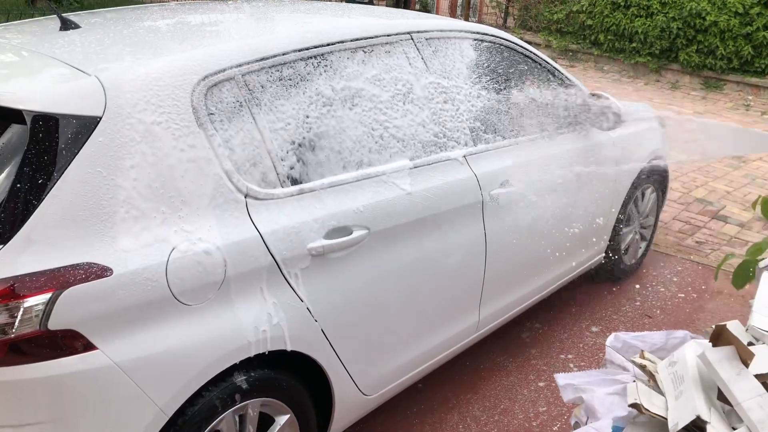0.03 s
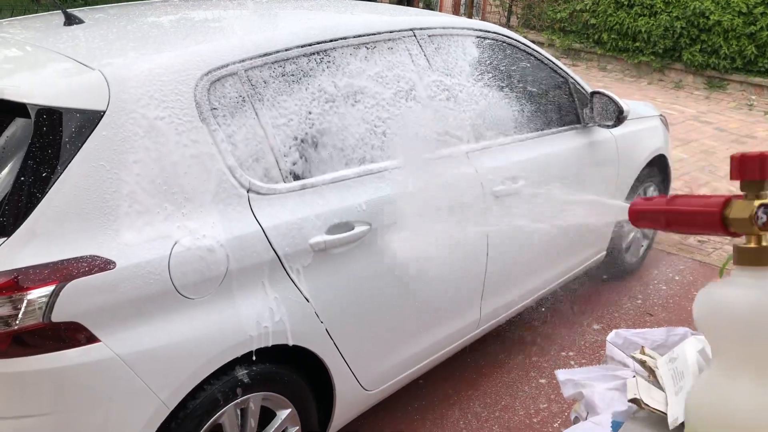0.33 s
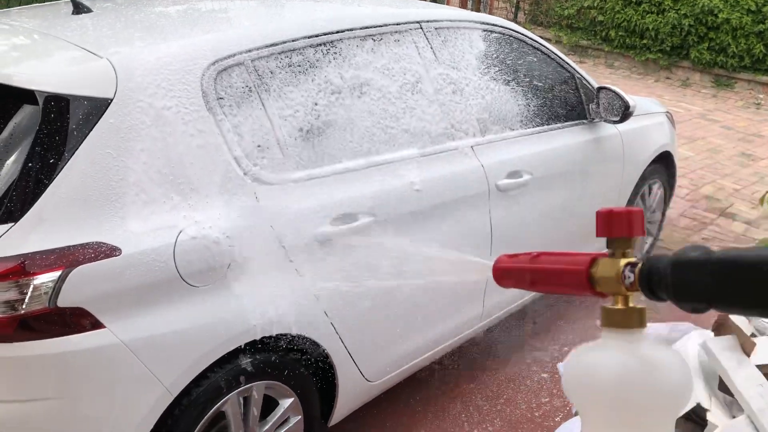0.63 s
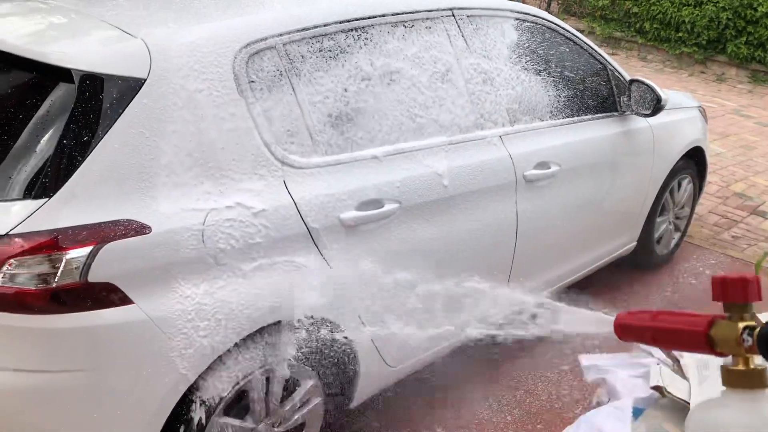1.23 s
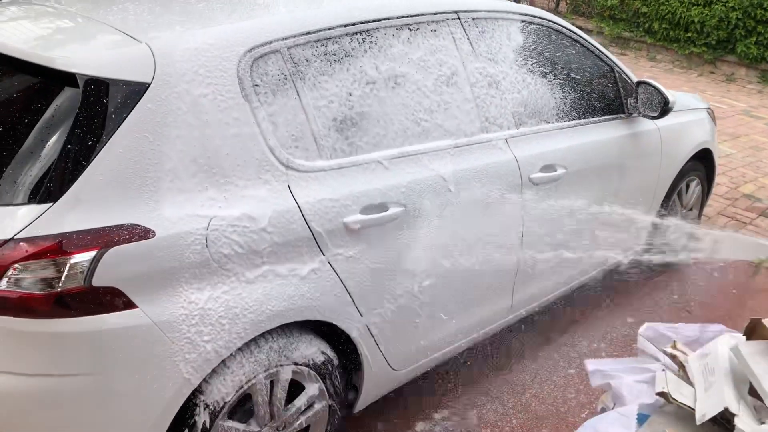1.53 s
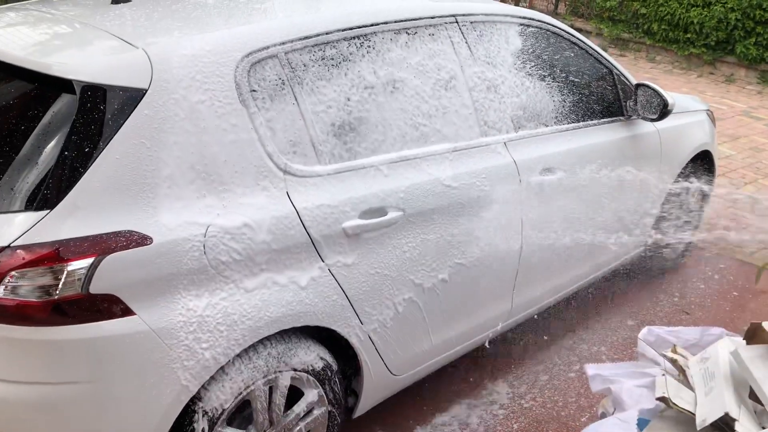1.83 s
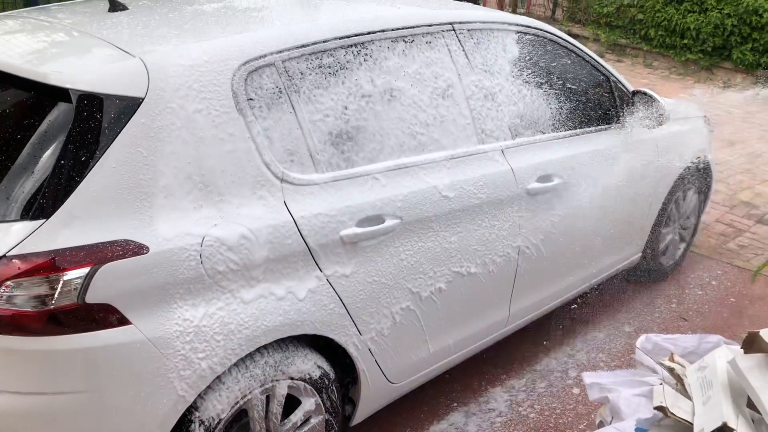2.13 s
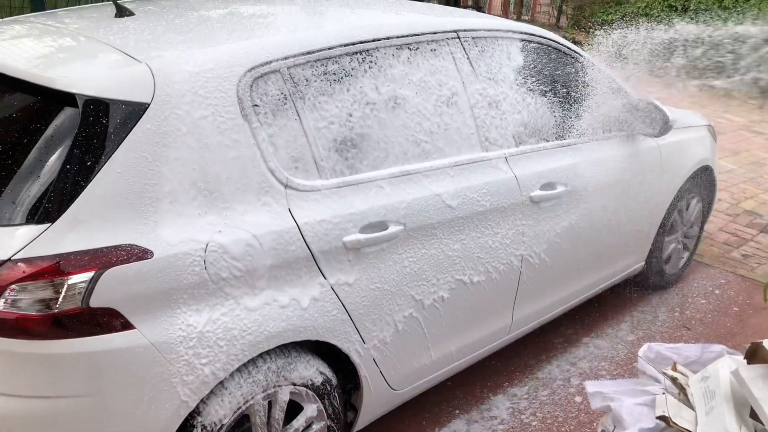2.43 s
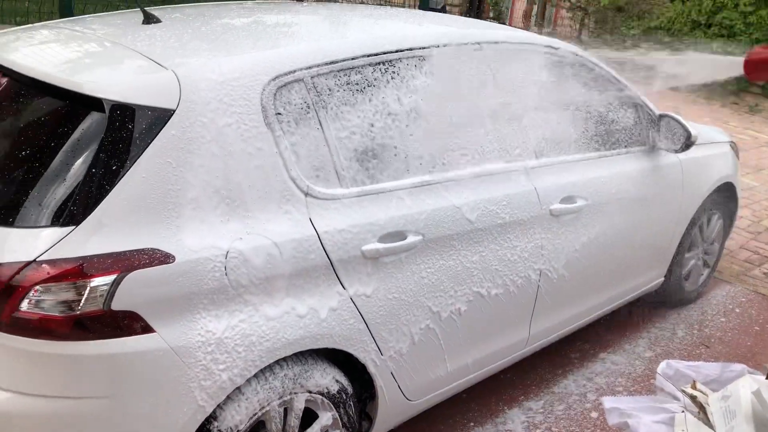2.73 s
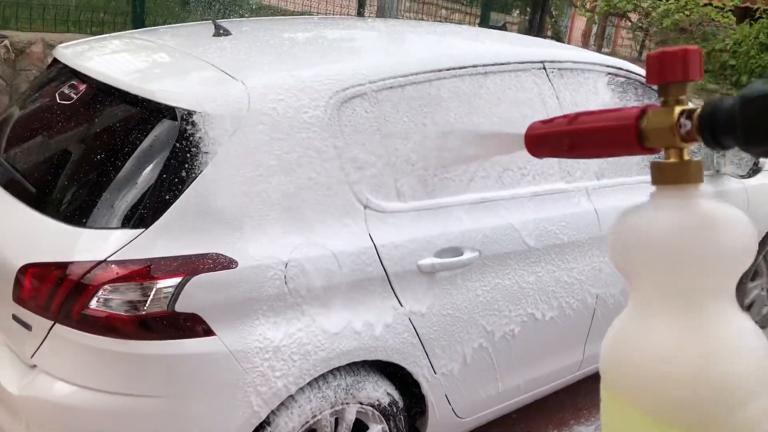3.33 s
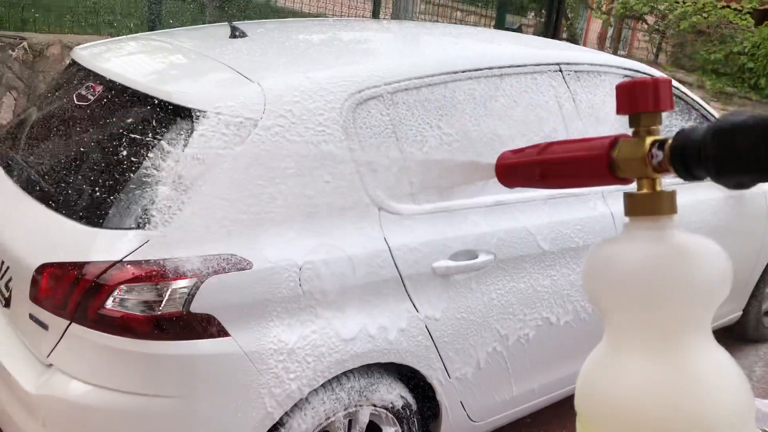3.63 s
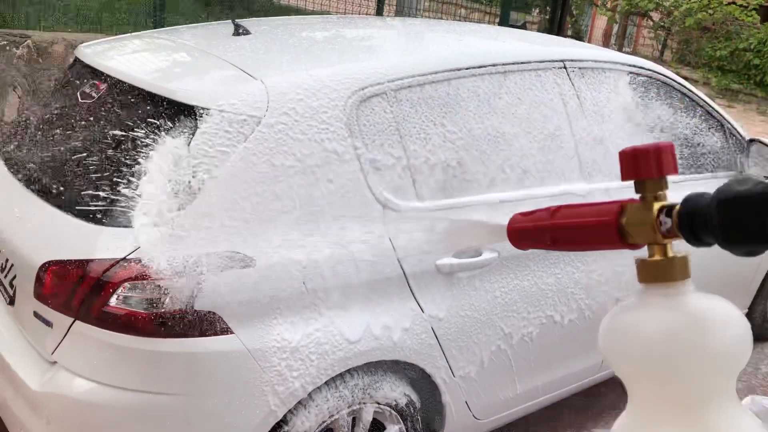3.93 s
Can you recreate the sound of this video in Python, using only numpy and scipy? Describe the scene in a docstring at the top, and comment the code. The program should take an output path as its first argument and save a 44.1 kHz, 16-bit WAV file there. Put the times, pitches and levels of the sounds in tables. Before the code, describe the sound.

A foam lance sprays a car with a loud, steady hiss and wet spatter, close to the microphone on a driveway. The panels drum dully and the jet swishes briefly, while a pressure washer hums faintly further off.

```python
"""Foam lance on a car

A foam lance sweeps along the side of a car on a driveway, heard close by and in mono. The nozzle
hisses, and the flow rings one hollow note in the lance. The fan of foam spatters on the panels, sets
them drumming and swishes where it crosses an edge. The pressure washer hums further off, and a few
puffs of air hit the microphone."""
import sys
import numpy as np
from scipy import signal
from scipy.fft import rfft, irfft
from scipy.io import wavfile
from scipy.ndimage import uniform_filter1d, map_coordinates

SR = 44100
rng = np.random.default_rng(int(sys.argv[2]) if len(sys.argv) > 2 else 0)


def inscribe(sig):
    """Save sig as 16-bit PCM at rate SR to the path in sys.argv[1].

    A 1-D sig is mono; a 2-D sig holds one channel per row.
    Samples are clipped to [-1, 1] before scaling.
    """
    pcm = np.round(np.clip(np.atleast_2d(sig).T, -1, 1) * 32767)
    wavfile.write(sys.argv[1], SR, pcm.astype(np.int16))


N = 176400

# Speed of the pump motor. Each row: time in seconds, shaft rate in Hz.
SHAFT_RATE = [(0, 46.5), (.6, 46.5), (1.5, 45.5), (2.3, 45.5), (3.2, 45.5), (4, 45.5)]
# Harmonics of the pump. Each row: multiple of the shaft rate, level in dB.
SHAFT_ORDERS = [(3, -52.5), (6, -37), (7, -49), (9, -45.5), (11, -44), (12, -46.5), (15, -48.5), (18, -49),
                (19, -44), (21, -49), (22, -49)]
# Puffs of air. Each row: centre in seconds, width in seconds, level in dB.
AIR_PUFFS = [(.07, .015, -50), (.205, .012, -51), (.725, 0.015, -37), (1.085, .015, -49), (1.18, .018, -45),
             (1.58, .014, -42), (1.9, .035, -48)]

# Envelopes along the sweep. Each row: time in seconds, relative level in dB.
PANEL_LEVEL = [(0.0, -35), (0.05, -32), (0.09, -33), (0.67, -31), (1.88, -34.5), (3.66, -29.5),
               (3.99, -32.5), (4.0, -28)]
FIZZ_LEVEL = [(0, -42), (.18, -31.5), (.26, -34), (.37, -29.5), (.7, -22.5), (.92, -20.5), (1.2, -21),
              (1.45, -24), (1.85, -28), (2.4, -28.5), (2.9, -26), (3.18, -24), (3.27, -21.5), (4, -20.5)]  # highest when the lance is near
NOTE_LEVEL = [(0, -40), (.08, -28), (.24, -32), (.32, -25), (.55, -24.5), (.72, -23.5), (1.3, -26.5),
              (2.08, -24.5), (2.35, -20), (2.65, -21.5), (3.08, -18.3), (3.35, -18.5), (3.65, -21.5),
              (3.8, -18.5), (4, -22)]
SPLASH_LEVEL = [(0, -31), (.16, -26), (.22, -26.5), (.31, -22), (.55, -19.5), (.75, -18.5), (1.25, -18),
                (1.5, -18), (1.85, -20.5), (2.1, -20), (2.4, -18.5), (2.65, -19), (3, -19), (3.35, -18.5),
                (3.7, -18.5), (4, -17.5)]
SLAP_LEVEL = [(0, -29.5), (.1, -25.5), (.23, -31), (.33, -24.5), (.55, -22.5), (.95, -22), (1.35, -23),
              (1.75, -23.5), (2.05, -27.5), (2.4, -28.5), (2.9, -26.5), (3.3, -28.5), (3.7, -29), (4, -27)]  # strongest on the door and wheel arch
# Spectra of the noises. Each row: frequency in Hz, relative spectral density in dB.
PANEL_SPECTRUM = [(20, -48), (55, -19.5), (100, -18), (160, -10.5), (235, 1), (345, -4), (470, 3.5),
                  (580, 1), (800, -3), (1100, -6), (1600, -0.5), (3000, -22), (16000, -60)]
FIZZ_SPECTRUM = [(1200, -32), (2200, -4), (5000, -38.5), (8500, -0.5), (10500, -1.5), (13000, -1),
                 (14500, 3), (15800, 3.5)]
SPLASH_SPECTRUM = [(700, -28), (1300, -20.5), (1750, -13), (2500, -3.5), (3100, -6), (4000, -4),
                   (4700, -4.5), (5400, 1), (6300, -2), (7300, -4), (8200, -9), (10500, -18.5),
                   (16000, -42)]
SLAP_SPECTRUM = [(600, -23), (1100, -12), (1500, -7.5), (1950, -1.5), (2450, 1), (2900, -1.5), (3500, -7.5),
                 (5000, -22), (16000, -62)]

# Hollow note of the lance. Each row: time in seconds, pitch in Hz.
LANCE_PITCH = [(0, 2080), (.7, 2054), (1.6, 2080), (2.4, 2150), (3.1, 2160), (3.5, 2115), (4, 2150)]
# The jet crosses an edge or hollow.
# Each row: start in seconds, length in seconds, first and last pitch in Hz, level in dB.
EDGE_CROSSINGS = [(0.287, 0.019, 2480, 2650, -18.5), (0.486, 0.031, 2730, 2580, -16),
                  (0.807, 0.16, 2300, 3500, -27), (1.242, .1, 4500, 2060, -19.5),
                  (1.782, 0.086, 3440, 2760, -22.5), (2.125, .06, 2800, 3400, -22)]
# Two broad resonances of the spray, shifting with the aim of the lance.
# Each row: time in seconds, centre in Hz, level in dB relative to SPLASH_LEVEL.
LOW_RESONANCE = [(0, 3930, -9), (.35, 3670, -8), (.7, 3730, -3), (1.2, 3800, -5.5), (1.55, 3950, -7),
                 (1.9, 3260, -6.5), (2.15, 3280, -2), (2.3, 4360, -24.5), (2.65, 4000, -6.5),
                 (3, 3760, -0.5), (3.3, 3560, -2), (3.65, 3540, -1), (4, 3930, -4.5)]
HIGH_RESONANCE = [(0, 5800, 4.5), (.6, 5460, -14), (1.2, 5640, -6.5), (1.4, 6100, -6), (1.6, 6140, -5.5),
                  (2, 6450, -1.5), (2.35, 6900, -1), (2.7, 6300, -8.5), (3.05, 6650, -1.5), (3.5, 5940, -8),
                  (4, 5700, -13)]
# Brief notches in the splash.
# Each row: time in seconds, width in seconds, centre in Hz, width in octaves, depth in dB.
SPLASH_NOTCHES = [(.01, 0.023, 3260, 0.3, 8), (.074, .013, 4540, 0.4, 10), (.2, .015, 5500, .6, 3.5),
                  (.25, 0.036, 2980, 0.13, 8), (.52, 0.041, 4930, 0.33, 5), (1.178, 0.0056, 4000, .8, 4),
                  (1.297, 0.012, 4230, .15, 10), (1.317, 0.011, 5700, 0.69, 6),
                  (2.165, .011, 5800, .4, 5.5), (3.3, 0.016, 5800, 0.36, 4.5)]

MAINS_HZ, MAINS_DB = 200, -50.5
HUM_START_DB, HUM_RISE_S, HUM_WAVER_DB = -6.5, .6, .57
PANEL_GAIN_DB, FIZZ_GAIN_DB, NOTE_GAIN_DB, HISS_GAIN_DB = .5, 5.5, -1, 1.5
DROPS_PER_S, DROP_SPREAD_DB, DROP_POWER_SHARE = 6000, 3.2, .33
NEAR_PATH_M, FAR_PATH_M, MAX_DRIFT_M_PER_S, SOUND_M_PER_S = .7, 7., .0699, 343


def amp(db):
    """Amplitude ratio of a level in decibels."""
    return 10 ** (np.asarray(db) / 20)


def unit(x):
    """Normalisation to rms 1."""
    return x / np.sqrt(np.mean(x ** 2) + 1e-20)


def curve(rows, column=1):
    """Linear interpolation of a time table at every sample."""
    rows = np.array(rows, float)
    return np.interp(np.arange(N) / SR, rows[:, 0], rows[:, column])


def colour(x, spectrum):
    """Spectral shaping, interpolated over log frequency, at rms 1."""
    hz, db = np.transpose(spectrum)
    gain_db = np.interp(np.log(np.fft.rfftfreq(N, 1 / SR) + 1), np.log(hz), db)
    return unit(irfft(rfft(x) * amp(gain_db), N))


def wander(rate_hz):
    """Random fluctuation: low-passed noise at rms 1."""
    hz = np.fft.rfftfreq(N, 1 / SR)
    return unit(irfft(rfft(rng.standard_normal(N)) * (hz > 1) / (1 + (hz / rate_hz) ** 2), N))


def resonate(x, hz, width_hz):
    """Forced resonance: x excites a band around a steady or moving centre, at rms 1."""
    carrier = np.exp(2j * np.pi * np.cumsum(hz * np.ones(len(x))) / SR)
    pole = np.exp(-np.pi * width_hz / SR)
    baseband = signal.lfilter([(1 - pole) ** 2], [1, -2 * pole, pole * pole], x / carrier)
    return unit((carrier * baseband).real)


def washer():
    """A rotating pump radiates harmonics of its shaft rate; these and a mains hum swell at the start."""
    t = np.arange(N) / SR
    turns = np.cumsum(curve(SHAFT_RATE) * (1 + .0016 * wander(rate_hz=2.3))) / SR
    partials = [(order * turns, db) for order, db in SHAFT_ORDERS] + [(MAINS_HZ * t, MAINS_DB)]
    hum = np.zeros(N)
    for cycles, db in partials:
        gain = amp(db + HUM_WAVER_DB * wander(rate_hz=3.5))
        hum += gain * np.sin(2 * np.pi * (cycles + rng.random()))
    return np.sqrt(2) * hum * amp(HUM_START_DB * np.maximum(1 - t / HUM_RISE_S, 0))


def puffs():
    """Pressure fluctuations of air striking the microphone make soft, low thumps."""
    t = np.arange(N) / SR
    swells = sum(amp(db) * np.exp(-.5 * ((t - centre) / width) ** 2) for centre, width, db in AIR_PUFFS)
    return resonate(rng.standard_normal(N), hz=66, width_hz=39) * swells


def panels():
    """Forced vibration: the bodywork drums dully under the spray."""
    return colour(rng.standard_normal(N), PANEL_SPECTRUM) * amp(curve(PANEL_LEVEL) + PANEL_GAIN_DB)


def reflect(x, count=12, echo_db=-8.5):
    """Interference with echoes off car, ground and walls forms a comb that drifts as the lance moves."""
    n, echoes = np.arange(N), np.zeros(N)
    paths = np.geomspace(NEAR_PATH_M, FAR_PATH_M, count)
    for path, (offset, drift, polarity) in zip(paths, rng.uniform(-.995, 1, (count, 3))):
        extra_m = path * (1 + .102 * offset) + MAX_DRIFT_M_PER_S * drift * n / SR
        delay = extra_m / SOUND_M_PER_S * SR
        echoes += np.sign(polarity) * map_coordinates(x, [n - delay], order=3, mode="mirror")
    return (x + amp(echo_db) * echoes / np.sqrt(count)) / np.sqrt(1 + amp(2 * echo_db))


def spray(patchy_db=1.15):
    """Shot noise of droplets plus rushing noise, modulated in brief patches of time and frequency."""
    impacts = (rng.random(N) < DROPS_PER_S / SR) * rng.choice([-1, 1], N)
    drops = unit(impacts * amp(DROP_SPREAD_DB * np.minimum(rng.exponential(1, N), 5)))
    noise = np.sqrt(1 - DROP_POWER_SHARE) * rng.standard_normal(N) + np.sqrt(DROP_POWER_SHARE) * drops
    spectra = signal.stft(noise, nperseg=512, noverlap=384)[2]
    patches = uniform_filter1d(rng.standard_normal(spectra.shape), size=11, axis=0)
    patches = unit(uniform_filter1d(patches, size=7, axis=1))
    return unit(signal.istft(spectra * amp(patchy_db * patches), nperseg=512, noverlap=384)[1][:N])


def swishes():
    """Gliding resonances sound briefly as the jet runs over wheel arches and seams."""
    t, out = np.arange(N) / SR, np.zeros(N)
    for start, length, first_hz, last_hz, db in EDGE_CROSSINGS:
        progress = np.clip((t - start) / length, 0, 1)
        pitch = first_hz + (last_hz - first_hz) * progress
        out += amp(db) * np.sin(np.pi * progress) * resonate(rng.standard_normal(N), pitch, width_hz=680)
    return out


def lance():
    """Flow noise fizzes at the nozzle, and the flow excites a hollow resonance in the lance."""
    fizz = colour(spray(patchy_db=1.5), FIZZ_SPECTRUM) * amp(curve(FIZZ_LEVEL) + FIZZ_GAIN_DB)
    note = resonate(rng.standard_normal(N), curve(LANCE_PITCH), width_hz=350)
    return fizz + note * amp(curve(NOTE_LEVEL) + NOTE_GAIN_DB)


def hollow(x):
    """Notch filtering: one band at a time fades briefly, and the sound turns hollow."""
    hz, t, spectra = signal.stft(x, SR, nperseg=512, noverlap=384)
    octave = np.log2(hz[:, None] + 1)
    cut_db = np.zeros(spectra.shape)
    for time, width_s, centre_hz, width_octaves, depth_db in SPLASH_NOTCHES:
        in_time = np.exp(-.5 * ((t - time) / width_s) ** 2)
        in_band = np.exp(-.5 * ((octave - np.log2(centre_hz)) / width_octaves) ** 2)
        cut_db += depth_db * in_time * in_band
    return signal.istft(spectra * amp(-cut_db), nperseg=512, noverlap=384)[1][:N]


def splash():
    """Impact noise of foam on the car: a wide hiss, two shifting resonances and a lower, wetter slap."""
    hiss = amp(HISS_GAIN_DB) * colour(spray(), SPLASH_SPECTRUM)
    low = amp(curve(LOW_RESONANCE, column=2)) * resonate(spray(), curve(LOW_RESONANCE), width_hz=1200)
    high = amp(curve(HIGH_RESONANCE, column=2)) * resonate(spray(), curve(HIGH_RESONANCE), width_hz=2000)
    slap = colour(spray(), SLAP_SPECTRUM) * amp(curve(SLAP_LEVEL))
    return hollow((hiss + low + high) * amp(curve(SPLASH_LEVEL)) + slap)


def scene():
    """Superposition of the sources, alike in both channels; the jet flutters with the water pressure."""
    jet = reflect(lance() + splash() + swishes())
    flutter_db = .45 * wander(rate_hz=80)
    return np.tile(jet * amp(flutter_db) + panels() + washer() + puffs(), (2, 1))


def record(dry, low_cut_hz=50, ceiling=.9, high_cut_hz=15720):
    """Band limiting, with soft saturation of the highest peaks between the low and high cuts."""
    x = signal.sosfilt(signal.butter(3, low_cut_hz, "high", fs=SR, output="sos"), dry)
    x = x / (1 + (x / ceiling) ** 8) ** (1 / 8)
    low_pass = signal.firwin(1023, high_cut_hz, window=("kaiser", 9), fs=SR)
    return signal.oaconvolve(x, low_pass[None], "same")


dry = scene()
out = record(dry)
inscribe(out)
```